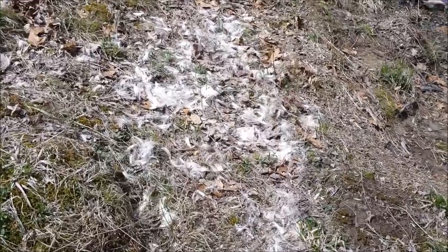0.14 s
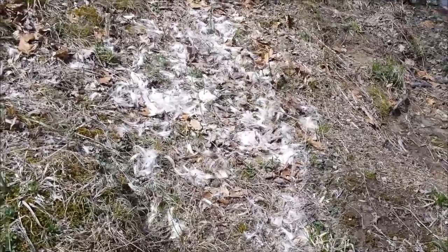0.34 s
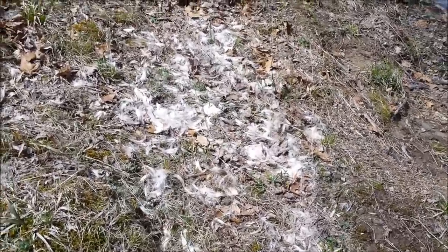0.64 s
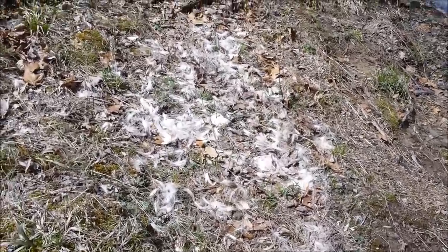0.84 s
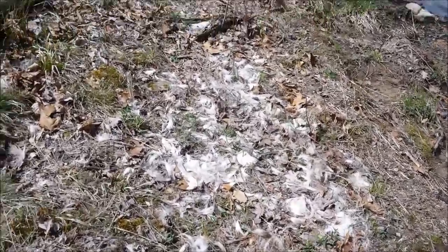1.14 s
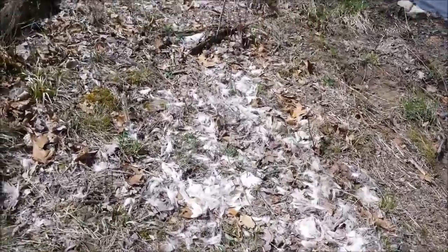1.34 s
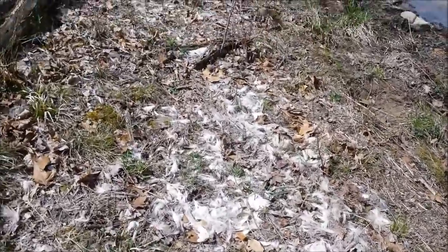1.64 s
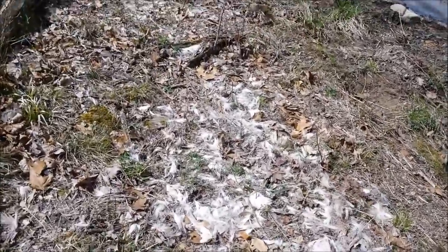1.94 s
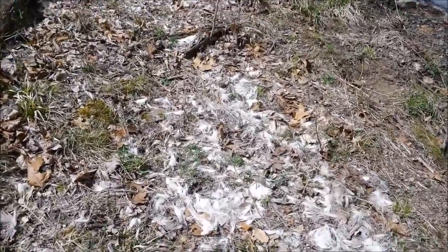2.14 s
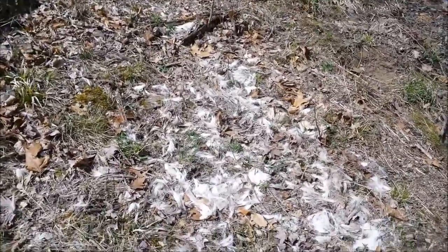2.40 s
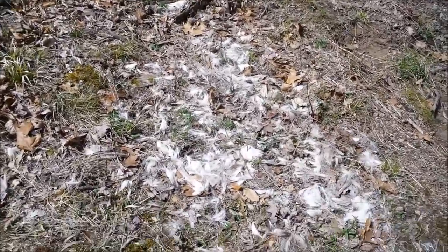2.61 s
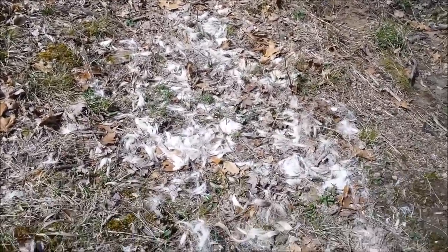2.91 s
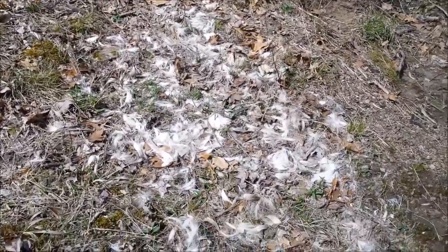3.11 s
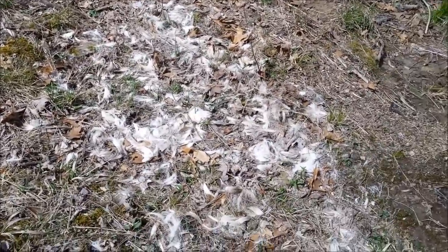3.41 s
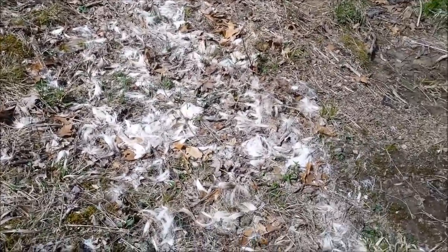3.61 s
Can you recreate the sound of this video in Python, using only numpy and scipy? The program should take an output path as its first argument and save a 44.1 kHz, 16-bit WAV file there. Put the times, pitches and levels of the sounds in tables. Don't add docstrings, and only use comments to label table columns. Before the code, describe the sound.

Dry leaf litter crackles and snaps under slow footfalls, with wind thumping unevenly on the microphone.

```python
import sys
import numpy as np
from scipy import signal
from scipy.fft import rfft, irfft
from scipy.io import wavfile
from scipy.ndimage import uniform_filter1d

SR = 44100
rng = np.random.default_rng(int(sys.argv[2]) if len(sys.argv) > 2 else 0)


def transcribe(signal):
    frames = np.atleast_2d(signal).T
    limited = np.clip(frames, -1, 1)
    pcm = np.round(limited * 32767).astype(np.int16)
    wavfile.write(sys.argv[1], SR, pcm)


def ratio(d):
    e = np.asarray(d, float) / 20
    return 10 ** e


N = 165375
T = np.arange(N) / SR


def unit(x):
    return x / np.sqrt(np.mean(x ** 2) + 1e-20)


def at_hz(points, hz):
    p = np.array(points)
    return np.interp(np.log(np.maximum(hz, 1)), np.log(p[:, 0]), p[:, 1])


def colour(x, points):
    gain = ratio(at_hz(points, np.fft.rfftfreq(N, 1 / SR)))
    return irfft(rfft(x) * unit(gain), N)


def resonance(x, hz, width_hz):
    r = np.exp(-np.pi * width_hz / SR)
    poles = [1, -2 * r * np.cos(2 * np.pi * hz / SR), r * r]
    return signal.lfilter([(1 - r * r) / 2, 0, (r * r - 1) / 2], poles, x)


def drift(rate_hz):
    hop = 40
    r = np.exp(-2 * np.pi * rate_hz * hop / SR)
    white = rng.standard_normal(N // hop + 1002)
    slow = signal.lfilter([1], [1, -2 * r, r * r], white)[1000:]
    return np.interp(np.arange(N) / hop, np.arange(len(slow)), unit(slow))


def grains(per_s, spread_db, hiss_db):
    grain_s = 0.0006
    sizes = ratio(spread_db * np.minimum(rng.exponential(1, N), 3))
    hits = sizes * (rng.random(N) < per_s / SR)
    bursts = unit(signal.lfilter([1], [1, -np.exp(-1 / (grain_s * SR))], hits + 1e-18))
    return unit(np.hypot(bursts, ratio(hiss_db)))


# (frequency [Hz], likeness [0-1])
PORT_LIKENESS = [(600, 1), (2500, 0.26), (7000, 0.71), (14000, 0.37)]
# (frequency [Hz], left minus right [dB])
PORT_BALANCE_DB = [(700, 6.5), (2400, 3.5), (4400, 1.5), (8100, -1), (15000, -6.5)]
# (frequency [Hz], phase [rad])
PORT_LEAD_RAD = [(600, 0.054), (2000, 1.35), (3500, 2.3), (4600, 0.26), (8000, .05)]


def ports(mid, side):
    hz = np.fft.rfftfreq(N, 1 / SR)
    alike = np.clip(at_hz(PORT_LIKENESS, hz), 0, 1)
    shared = np.sqrt((1 + alike) / 2) * rfft(mid)
    unlike = np.sqrt((1 - alike) / 2) * rfft(side)
    tilt = ratio(at_hz(PORT_BALANCE_DB, hz) / 2) * np.exp(.5j * at_hz(PORT_LEAD_RAD, hz))
    return irfft(np.array([(shared + unlike) * tilt, (shared - unlike) / tilt]), N)


# (frequency [Hz], level [dB per Hz])
STEM_SPECTRUM = [(220, -38), (550, -11.5), (900, -5.5), (1300, -2.5), (2400, -5), (3300, -3.5), (3800, -6),
                 (5000, -8.5)]
# (frequency [Hz], level [dB per Hz])
LEAF_SPECTRUM = [(2500, -9), (3900, -5), (5000, -4), (9000, -4.5), (11800, -7), (14200, -0.5), (15200, 4.5)]


def crush(pressure, stems_db, stem_hz, leaf_hz, per_s, spread_db):
    hiss_db = 0.5
    leaf = colour(rng.standard_normal((2, N)) * grains(per_s, spread_db, hiss_db), LEAF_SPECTRUM)
    leaf = unit(leaf + ratio(18.5) * resonance(leaf, leaf_hz, width_hz=1700))
    stem = colour(rng.standard_normal((2, N)) * grains(per_s * .8, 0.64 * spread_db, hiss_db), STEM_SPECTRUM)
    stem = unit(stem + ratio(3) * resonance(stem, stem_hz, width_hz=800))
    return pressure * ratio(drift(27)) * (leaf + ratio(stems_db - 1.5) * stem)


# (time [s], level [dB])
SOLE_PRESSURE = [
    [(0, -41.5), (.16, -38), (.2, -39.5), (.29, -34.5), (.345, -25), (.42, -35), (.49, -45.5), (.66, -54.5),
     (.98, -52)],
    [(.98, -52.5), (1.055, -45.5), (1.065, -39), (1.16, -38.5), (1.18, -39.5), (1.23, -37.5), (1.48, -46),
     (1.53, -57), (1.84, -60)],
    [(1.84, -43), (1.866, -44), (1.874, -28.5), (1.89, -30.5), (1.945, -30), (1.965, -36), (2.02, -39.5),
     (2.07, -41.5), (2.3, -62.5)],
    [(2.3, -57), (2.6, -63), (3.12, -58), (3.47, -61), (3.54, -53.5), (3.6, -58), (3.7, -60.5), (3.75, -55)],
]
# (stem crunch level [dB], stem pitch [Hz], leaf crackle pitch [Hz],
# grain rate [1/s], grain spread [dB])
LITTER_KINDS = [
    (-2.5, 2500, 6870, 1500, 1),
    (-1.5, 2280, 7230, 900, 3),
    (-6, 2780, 7820, 670, -5.5),
    (-3.5, 2470, 7550, 800, -3.5),
]
# (time [s], peak level [dB], length [s])
BOOT_BRUSHES = [
    (0.865, -44.5, 0.036),
    (0.944, -44, 0.04),
    (1.848, -48, 0.03),
]


def footfalls():
    crushed = 0
    for rows, kind in zip(SOLE_PRESSURE, LITTER_KINDS):
        s, db = np.transpose(rows)
        pressure = ratio(np.interp(T, s, db, left=-120, right=-120))
        crushed = crushed + crush(pressure, *kind)
    touch, fade_s = 0, 0.012
    for s, db, length in BOOT_BRUSHES:
        touch = touch + ratio(db) * (T > s) * np.clip((s + length - T) / fade_s, 0, 1)
    brushed = crush(touch, stems_db=-4.0, stem_hz=2000, leaf_hz=8200, per_s=400, spread_db=5.0)
    return ports(*(crushed + brushed))


def snaps(rows, cycles, crack, pan_db):
    rise_s, tail_s, size = 0.00045, 0.0016, 1024
    out, t = np.zeros((2, N + size)), np.arange(size) / SR
    pan = pan_db * np.array([[.5], [-.5]])
    for (s, db, hz), noise in zip(rows, rng.standard_normal((len(rows), 2, size))):
        ring = 2.8 * np.sin(2 * np.pi * hz * t) * np.exp(-3 * t * hz / cycles) * (1 - np.exp(-t / rise_s))
        splinters = 0.43 * noise[0] + .5 * noise[1] * np.array([[1], [-1]])
        puff = ratio(-5) * splinters * np.exp(-t / tail_s)
        puff = 2.5 * resonance(puff, hz, hz * .4) + crack * puff
        i = int(s * SR)
        out[:, i:i + size] += ratio(db - 1.5 + pan) * (ring + puff)
    return signal.sosfilt(signal.butter(2, 322, "high", fs=SR, output="sos"), out[:, :N])


# (time [s], peak level [dB], pitch [Hz])
RIB_SNAPS = [(.0189, -29, 6160), (.2461, -19, 6850), (.3045, -20.5, 7140), (.351, -10, 7150),
             (.3717, -26, 7340), (.5372, -26, 7600), (.6669, -37.5, 6840), (.867, -34, 9200),
             (.882, -31, 7100), (.946, -32, 6660), (.957, -28, 7430), (1.1029, -23, 8200),
             (1.167, -22.5, 8400), (1.206, -20.5, 7200), (1.2245, -16, 8570), (1.27, -24, 8900),
             (1.334, -23.5, 7000), (1.365, -23, 6640), (1.373, -31, 6500), (1.8255, -26, 8900),
             (1.881, -19, 7640), (1.9262, -16.5, 8050), (2.0346, -13.5, 7940), (2.2943, -35, 7260),
             (2.873, -37.5, 10100), (3.1243, -43, 4860), (3.4915, -46, 8900), (3.6293, -33, 7000),
             (3.7172, -39, 9000)]


def leaf_ribs():
    return snaps(RIB_SNAPS, cycles=12.3, crack=0.38, pan_db=-1)


# (time [s], peak level [dB], pitch [Hz])
TWIG_SNAPS = [(.8815, -33.5, 1320), (1.0605, -18, 2170), (1.065, -26, 2580), (1.14, -36.5, 373),
              (1.1915, -16.5, 1970), (1.206, -22, 1570), (1.242, -22, 2020), (1.281, -23.5, 2000),
              (1.4153, -17, 1350), (1.4153, -14.5, 2040), (1.4154, -22.5, 3200), (1.488, -47, 505)]


def twigs():
    return snaps(TWIG_SNAPS, cycles=2.6, crack=0.26, pan_db=6)


# (time [s], peak level [dB], pitch [Hz])
CELL_TICKS = [(0.0606, -23.5, 6630), (0.0946, -29, 6460), (0.1001, -36, 6890), (0.109, -32, 6120),
              (0.1276, -23, 6850), (0.1429, -21, 7020), (0.1509, -25, 5860), (0.1621, -18, 6400),
              (0.2124, -22, 7200), (0.2552, -21, 6930), (0.2618, -15, 6900), (0.2718, -30, 6760),
              (0.2791, -27, 6800), (0.4287, -34, 7020), (0.4335, -21, 6500), (0.5606, -35, 6630),
              (0.5768, -33.5, 7110), (1.0606, -24.5, 6300), (1.1363, -21, 7900), (1.1523, -20.5, 8200),
              (1.1922, -25, 4520), (1.1992, -29, 6850), (1.2883, -28, 8740), (1.2942, -21.5, 7060),
              (1.3467, -40, 7620), (1.4153, -33, 6900), (1.8703, -25, 8440), (1.8903, -17, 7540),
              (1.8984, -13, 7800), (1.9335, -16.5, 7540), (1.9403, -23, 7850), (1.964, -22, 7620),
              (2.0253, -36, 7410), (2.0462, -24, 7540), (2.0508, -29, 7110), (2.0619, -29, 6840),
              (2.0786, -30, 7800), (2.0907, -27.5, 8200), (2.1171, -31, 7450), (2.1904, -40.5, 6460),
              (2.1963, -37, 6630), (2.2245, -37, 6700), (3.5521, -39, 6890), (3.5737, -38, 6700)]


def leaf_cells():
    return snaps(CELL_TICKS, cycles=10.2, crack=1, pan_db=-1)


# (time [s], peak level [dB], pitch [Hz])
BUCKLING_STEMS = [(0.0198, -40, 1460), (0.095, -32, 2240), (0.1003, -32, 2330), (0.1092, -28, 2410),
                  (0.1428, -23.5, 3030), (0.1624, -27.5, 2410), (0.2483, -27, 3100), (0.2675, -29, 2900),
                  (0.3518, -18, 2930), (0.5846, -37.5, 2340), (0.8942, -36.5, 2170), (1.1081, -32.5, 1790),
                  (1.199, -23, 2280), (1.2256, -33, 1470), (1.3347, -32, 2800), (2.0354, -32, 3010)]


def stem_knocks():
    return snaps(BUCKLING_STEMS, cycles=4.1, crack=0.21, pan_db=5.8)


# (frequency [Hz], level [dB per Hz])
WIND_SPECTRUM = [(22, -37), (45, -16.5), (85, -2.5), (160, -6.5), (270, -12.5), (400, -31.5), (700, -51),
                 (1200, -45)]


def wind(gusts, breeze_db):
    reference_db, brighten_per_octave, steepen_s, port_top = -18.5, 0.36, 0.003, 0.22
    power = ratio(2 * breeze_db)
    for s, db, length in gusts:
        power = power + ratio(2 * db) * np.exp(-.5 * ((T - s) / (0.4 * length)) ** 2)
    eddies_db = 4.5 * np.tanh(drift(20.4))
    force_db = 10 * np.log10(power) - reference_db + eddies_db
    out, white = 0, rng.standard_normal((2, N))
    edges = 18 * 2 ** np.arange(0, 6.6, .5)
    for k, (low, high) in enumerate(zip(edges, edges[1:])):
        band = signal.sosfilt(signal.butter(3, [low, high], "band", fs=SR, output="sos"), white[k % 2])
        hz = np.sqrt(low * high)
        brighter_db = force_db * brighten_per_octave * np.log2(hz / 110)
        out = out + band * ratio(at_hz(WIND_SPECTRUM, hz) + brighter_db)
    level = np.sqrt(uniform_filter1d(out ** 2, size=1800) + 1e-20)
    out = out / level * ratio(force_db + reference_db - 2.0)
    out = port_top * np.tanh(out / port_top)
    steep = np.interp(T - steepen_s * out, T, out)
    return signal.sosfilt(signal.butter(4, 750, fs=SR, output="sos"), steep)


# (time [s], peak level [dB], width [s])
LEFT_SLAPS = [(0.134, -30, 0.0016), (2.019, -18.5, 0.0014), (2.052, -26.5, 0.0021), (2.226, -13, 0.00098),
              (2.249, -13, 0.00091), (2.263, -13, 0.002), (2.294, -16.5, 0.00094), (2.347, -21.5, 0.001),
              (2.423, -13.5, 0.0014), (2.6009, -9, .0015), (2.69, -20, 0.0014), (2.84, -20.5, 0.00086),
              (2.901, -14, 0.0013), (3.351, -17, 0.0012), (3.429, -29, 0.0012)]


def slaps():
    out = 0
    for s, db, width in LEFT_SLAPS:
        u = ((T - s) / width) ** 2
        out = out + ratio(db) * (u - 1) * np.exp(-.5 * u)
    return out


# (time [s], level [dB], length [s])
GUSTS_LEFT = [(.07, -32, 0.06), (.149, -24, 0.049), (.274, -22.5, 0.0071), (.347, -25, 0.026),
              (.459, -35, 0.031), (.645, -19.5, 0.05), (.75, -22.5, 0.031), (.795, -17.5, 0.02),
              (1.0, -40, 0.029), (1.398, -42, 0.2), (1.802, -43, 0.18), (1.914, -21.5, 0.032),
              (2.04, -22, 0.032), (2.153, -17, 0.012), (2.215, -21, 0.047), (2.255, -15, 0.012),
              (2.345, -20.5, 0.032), (2.295, -20, 0.065), (2.415, -16.5, 0.032), (2.59, -29, 0.075),
              (2.698, -16.5, 0.028), (2.85, -17, 0.04), (2.9, -28, 0.12), (3.09, -30, 0.044),
              (3.23, -33, 0.16), (3.364, -20, 0.05), (3.43, -20.5, 0.018), (3.645, -23, 0.035)]
# (time [s], level [dB], length [s])
GUSTS_RIGHT = [(.1, -32.5, 0.028), (.28, -37, 0.035), (.761, -28.5, 0.01), (1.45, -46.5, 0.11),
               (1.84, -41, 0.05), (2.435, -39, 0.039), (2.827, -32, 0.1), (3.155, -28.5, 0.036),
               (3.34, -44, 0.028), (3.59, -29.5, 0.1), (3.708, -28, 0.032)]
# (time [s], left level [dB], right level [dB])
STEADY_BREEZE = [
    (0, -39, -53),
    (.75, -42.5, -54),
    (.9, -45, -53.5),
    (1.75, -46.5, -48),
    (1.952, -33, -44.5),
    (2.301, -30.5, -42),
    (2.9, -26, -35),
    (3.05, -38, -37.5),
    (3.75, -35.5, -48),
]


def breeze():
    s, left_db, right_db = np.transpose(STEADY_BREEZE)
    left = wind(GUSTS_LEFT, np.interp(T, s, left_db)) + slaps()
    right = wind(GUSTS_RIGHT, np.interp(T, s, right_db))
    travel = 0.36
    return travel * np.tanh(np.array([left, right]) / travel)


# (frequency [Hz], level [dB per Hz])
FAR_SPECTRUM = [(240, -4.5), (400, -6), (652, -10), (1240, -20), (4270, -20), (7510, -18.5), (13800, -19.5),
                (14700, -33), (15400, -61)]


def far_rustle():
    hiss = colour(rng.standard_normal((2, N)), FAR_SPECTRUM)
    sway_db = .5 * drift(8.7) + 1.0 * drift(25)
    sides_db = np.array([[-1.5], [1.5]])
    white = rng.standard_normal((2, N))
    ticks = colour(white * grains(per_s=60, spread_db=3.5, hiss_db=-30), FAR_SPECTRUM)
    return hiss * ratio(-59 + sway_db + sides_db) + ratio(-68) * ports(*ticks)


def scene():
    air = breeze()
    litter = footfalls() + leaf_ribs() + twigs() + leaf_cells() + stem_knocks()
    return litter + air + far_rustle()


def roll_off(x):
    return signal.sosfilt(signal.butter(12, 15830, fs=SR, output="sos"), x)


def record(dry):
    notched = dry - 0.15 * resonance(dry, 3756, width_hz=330)
    clipped = np.clip(notched, -.295, .295)
    mix = signal.sosfilt(signal.cheby2(12, 40, 14990, fs=SR, output="sos"), clipped)
    return roll_off(mix)


dry = scene()
out = record(dry)
transcribe(out)
```